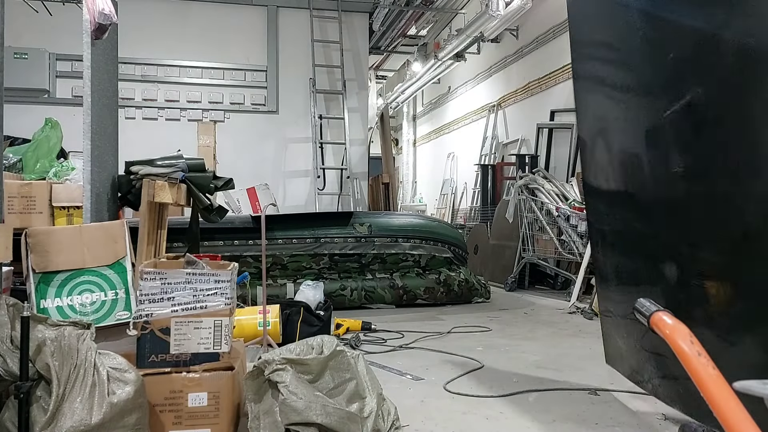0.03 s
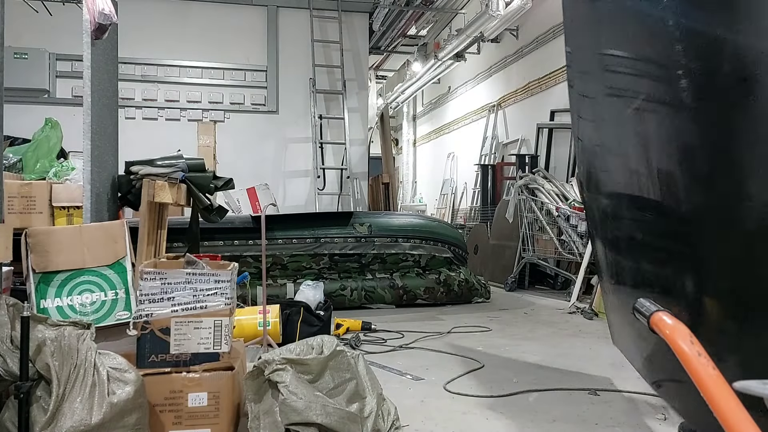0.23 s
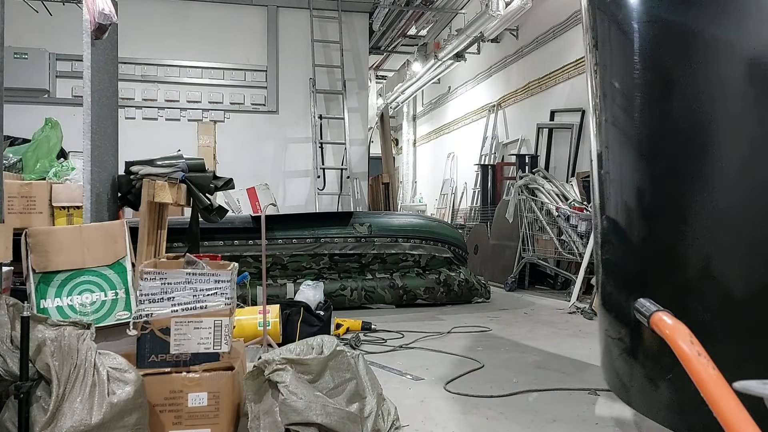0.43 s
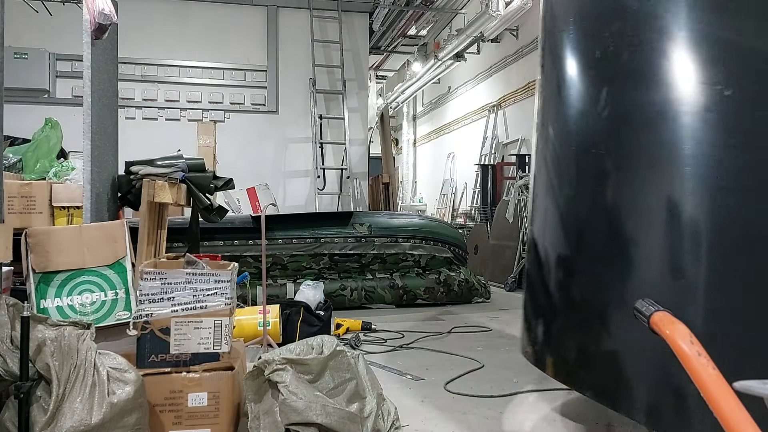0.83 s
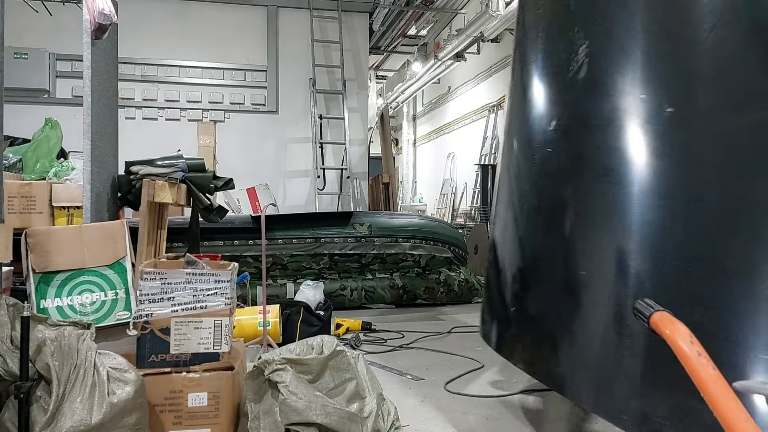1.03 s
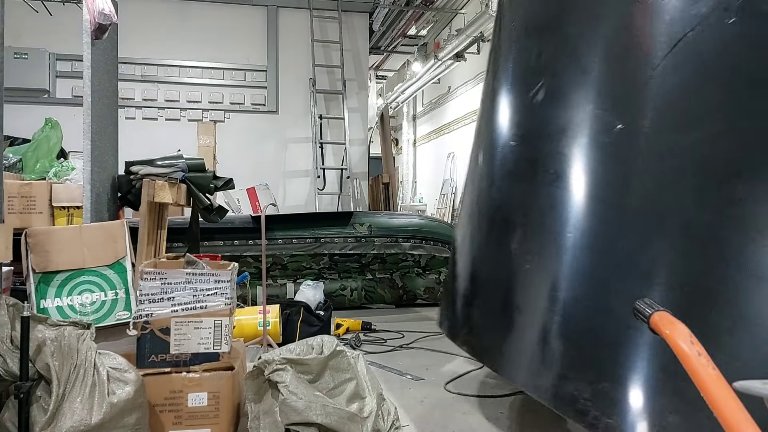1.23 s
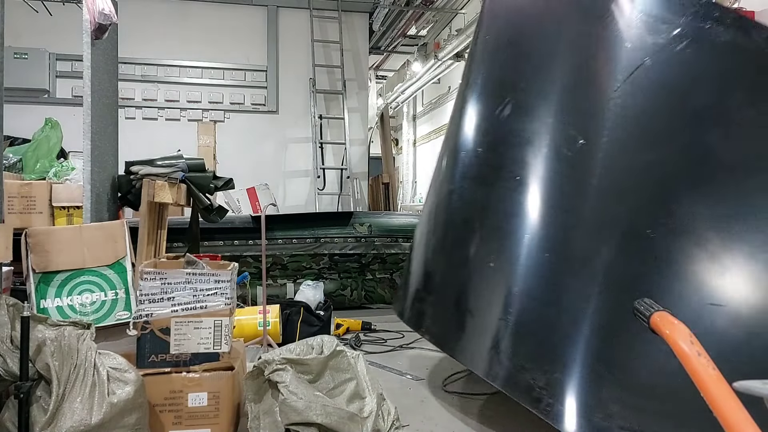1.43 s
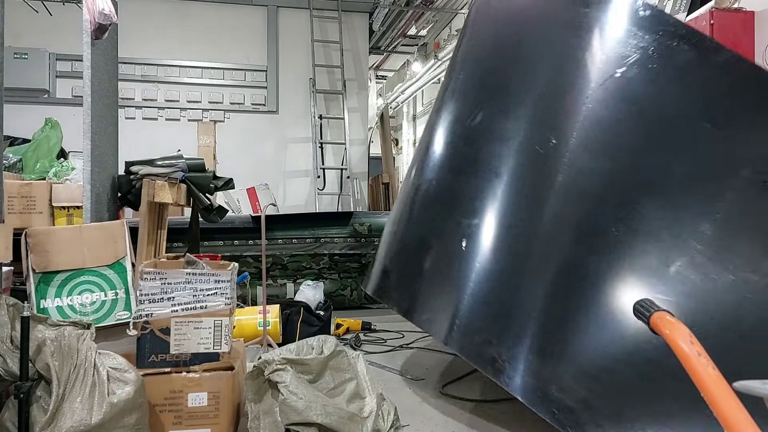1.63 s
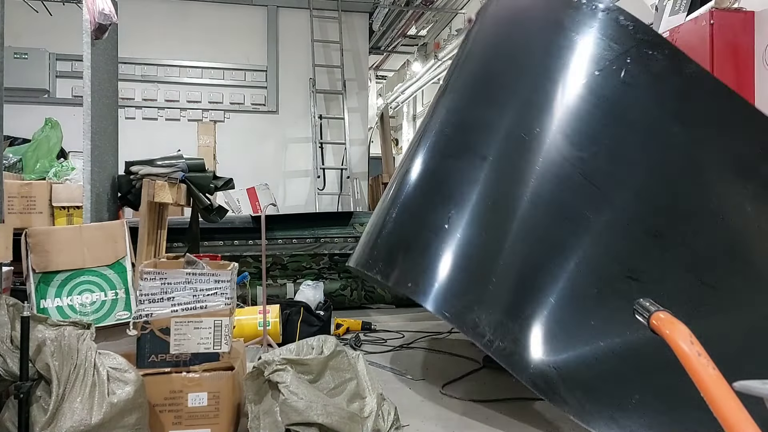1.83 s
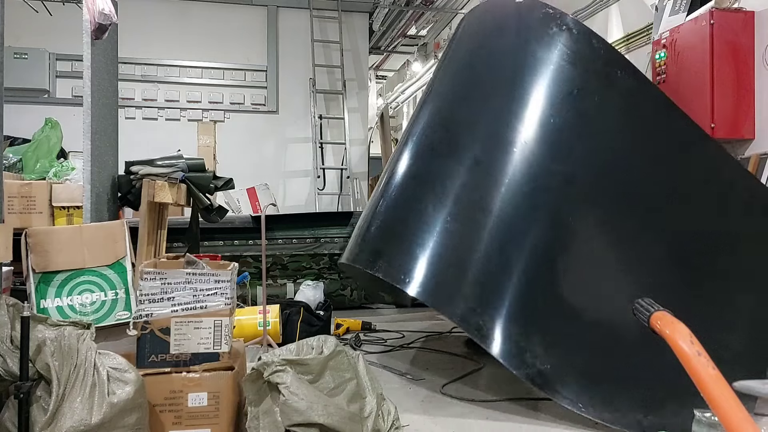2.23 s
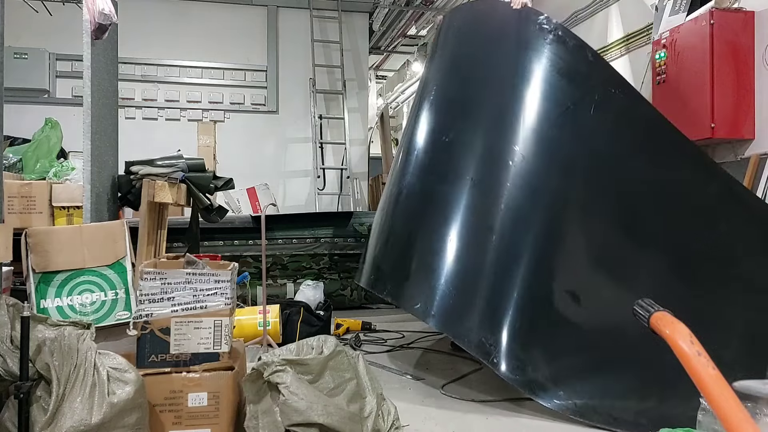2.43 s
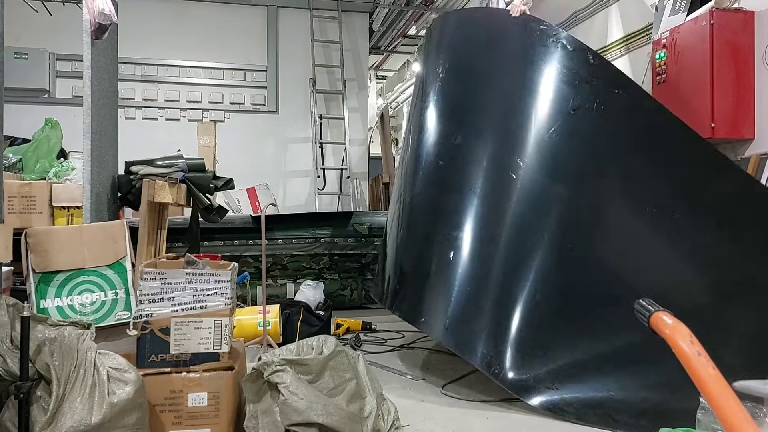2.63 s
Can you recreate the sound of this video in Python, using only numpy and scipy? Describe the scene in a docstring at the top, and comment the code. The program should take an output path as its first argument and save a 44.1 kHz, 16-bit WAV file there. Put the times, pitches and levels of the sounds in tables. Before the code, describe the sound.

A large plastic sheet is dragged across a concrete workshop floor. It buckles with soft thuds and judders in a low drone, then slides on with a gritty hiss and a brief wobble. Close by, with light hall reverberation.

```python
"""A workshop with a concrete floor, over which a large plastic sheet is dragged and bent.
Sliding friction on the grit makes the edge hiss, and stick-slip motion sets fixed low resonances of
room and sheet droning, while another glides as the sheet bends. Now and then the edge catches and the
sheet buckles with a thud; the whole sheet wobbles. The hall reverberates over a faint room noise."""
import sys
import numpy as np
from scipy import signal
from scipy.fft import rfft, irfft
from scipy.io import wavfile
from scipy.ndimage import uniform_filter1d

SR = 44100
rng = np.random.default_rng(int(sys.argv[2]) if len(sys.argv) > 2 else 0)


def unload_wav(signal):
    """Save mono or channel-first audio to the path in sys.argv[1] as 16-bit WAV at rate SR, clipped to [-1, 1]."""
    wavfile.write(
        sys.argv[1],
        SR,
        np.round(np.clip(np.atleast_2d(signal).T, -1, 1) * 32767).astype(np.int16),
    )


N = 119070
TIME = np.arange(N) / SR

# Fixed low resonances of room and sheet, droning and ringing. Each row: frequency in Hz, decay time T60
# in seconds, then relative levels in dB when bumped, in the judder and in the wobble.
RESONANCES = [(42, 0.61, -34, -38, -11), (57.3, 0.14, -24.5, -36, -5), (74.6, 0.2, -16, -24, 2),
              (113.4, 0.31, -34, -30, 8.5), (123.2, 0.37, -7, -16.5, -8), (141.8, 0.6, -14.5, -11.5, -43),
              (206.4, 0.6, -8, -5.5, -27), (227.3, 0.3, 2, -5, -28), (259, 0.49, -14, -4, -21),
              (290, 0.6, -19, -5.5, -3), (402.4, .25, -5.5, -3, -33), (455.4, 0.42, -5, -8, -39),
              (533.4, 0.6, -6.5, -11, -42), (585.5, 0.45, -22, -10.5, -42), (823, 0.58, -32, -14, -37)]
# Dense ring between the resonances. Each row: frequency in Hz, relative spectral level in dB.
BODY_SPECTRUM = [(90, -23), (125, -36), (170, -14), (250, 10), (340, 8), (450, 1), (560, 3), (650, -28),
                 (820, -32), (1200, -38), (2500, -58)]
# Main resonance of the bent sheet. Each row: time in seconds, frequency in Hz.
BEND_PITCH = [(0, 293), (.19, 269), (.215, 198), (.4, 219), (.6, 249), (.85, 255), (1.05, 247), (1.36, 227),
              (1.88, 250), (2.1, 285), (2.45, 288), (2.7, 267)]
# Strength of the judder. Each row: time in seconds, level in dB.
JUDDER_LEVEL = [(0, -42.5), (.12, -39.5), (.2, -39), (.28, -33.5), (.44, -25), (.57, -34.5), (.66, -26),
                (.76, -24.5), (.85, -24.5), (1.02, -28.5), (1.22, -41.5), (1.82, -58), (1.88, -40),
                (1.95, -39.5), (2.09, -35.5), (2.22, -36.5), (2.44, -44.5), (2.6, -70), (2.67, -43.5),
                (2.7, -44)]
# Buckling thuds. Each row: start in seconds, relative level in dB, pitch in Hz.
BUCKLES = [(.0, -32.5, 119), (.215, -18.5, 182), (.228, -18.5, 193), (0.267, -17, 128), (.27, -17.5, 245),
           (.283, -22.5, 283), (.304, -18, 127), (0.316, -16.5, 233), (0.328, -17.5, 125),
           (0.365, -19.5, 125), (.39, -19.5, 216), (0.407, -15, 231), (0.442, -21.5, 234), (.491, -20, 241),
           (.505, -23.5, 129), (.547, -25, 224), (.587, -21.5, 248), (1.324, -32.5, 131), (1.335, -31, 230),
           (1.361, -28.5, 217), (1.38, -33, 135), (1.875, -34, 245), (2.275, -36, 75), (2.299, -32, 102),
           (2.435, -31, 106)]
# Strength of the wobble. Each row: time in seconds, level in dB.
WOBBLE_LEVEL = [(0, -40), (.08, -43.5), (.2, -41), (.23, -34), (.38, -36), (.6, -42.5), (1.1, -50),
                (1.28, -66), (1.42, -47), (1.65, -55), (1.82, -59), (2.18, -54), (2.3, -41.5),
                (2.45, -41.5), (2.55, -53), (2.7, -53)]
# Hiss (following the sliding speed), scrape and sizzle. Each row: time in seconds, relative level in dB.
HISS_LEVEL = [(0.0, -56.5), (0.07, -59.5), (0.25, -48), (0.31, -50), (0.5, -42.5), (0.77, -42.5),
              (1.04, -39), (1.65, -37.5), (2.04, -39.5), (2.09, -43), (2.42, -39), (2.62, -58.5),
              (2.65, -47.5), (2.7, -49.5)]
SCRAPE_LEVEL = [(0, -50), (.15, -49), (.35, -48), (.55, -47), (.76, -66), (.83, -40.5), (.95, -38),
                (1.1, -49.5), (1.4, -46), (1.65, -44), (1.85, -44), (2.2, -39), (2.33, -34.5),
                (2.45, -35.5), (2.6, -54.5), (2.66, -46), (2.7, -46)]
SIZZLE_LEVEL = [(0, -56.5), (.14, -48.5), (.168, -44), (.205, -50), (.25, -46.5), (.35, -49), (.5, -44),
                (1.2, -44.5), (1.95, -44), (2.3, -46.5), (2.55, -68), (2.7, -51)]
# Treble of the hiss, duller as the sheet slows. Each row: time in seconds, gain in dB.
TREBLE_GAIN = [(0, 0.5), (.6, 0), (1.0, 1), (1.6, 0), (1.95, .5), (2.25, 1.5), (2.42, -3), (2.55, -5),
               (2.7, -3)]
# Dull rubs of the edge. Each row: start in seconds, length in seconds, level in dB.
EDGE_SCUFFS = [(0.071, 0.046, -40), (0.118, 0.061, -36.5), (0.199, 0.047, -34), (0.239, 0.051, -33),
               (0.4, 0.059, -32)]
# Friction noises and the quiet room. Each row: frequency in Hz, relative spectral level in dB.
HISS_SPECTRUM = [(300, -2), (600, 3), (1200, 2), (2000, 1), (3300, -.5), (4800, -0.9), (7000, -6.5),
                 (8800, -6), (10200, -8), (11800, -4), (14000, -14), (16000, -12)]
SCRAPE_SPECTRUM = [(250, 0), (500, -11.5), (800, -4.5), (1200, -5.5), (1900, -14.5), (3000, -19.5),
                   (6000, -54), (12000, -30)]
SIZZLE_SPECTRUM = [(5000, -25), (8000, -13), (10300, -5.5), (11700, 3), (13000, 7.5), (16000, 6)]
SCUFF_SPECTRUM = [(330, -29), (450, 3.5), (560, 0), (660, -10), (830, -10.5), (1200, -32), (2500, -50)]
ROOM_SPECTRUM = [(36, -12), (44, 9), (100, 4), (300, -26), (1000, -18), (4000, -29), (16000, -36)]
# Likeness of left and right. Each row: frequency in Hz, correlation (limited to 0.99 in use).
COHERENCE = [(60, 2.6), (130, 1.1), (260, 0.8), (500, 0.66), (900, 0.42), (1500, 0.37), (3000, -0.18),
             (6000, 0.02), (16000, -0.03)]
# Stereo balance. Each row: frequency in Hz, left minus right in dB.
PAN = [(60, 8), (130, -3), (280, -0.9), (1200, 0), (2500, -1.5), (4500, 0.5), (8500, 1.5), (13000, -3.5)]

HALL_T60_S, HALL_DB = .7, -8


def judder():
    """Forced vibration: the slips of the edge keep the resonances of room and sheet droning."""
    force = slips()
    modes = driven_modes(force, [mode[3] for mode in RESONANCES], contact_hz=590)
    body = from_db(-2) * unit_rms(body_ring(force))
    bend = from_db(-3.5) * steady(bend_resonance(force), seconds=.065)
    return level(JUDDER_LEVEL) * steady(modes + body + bend, seconds=.0466)


def slips(per_second=75, jitter=.4, spread_db=3.5):
    """Stick-slip friction: the edge grips and lets go in an uneven train of impulses."""
    gap, strength = rng.standard_normal((600, 2)).T
    starts = (np.cumsum(np.exp(jitter * gap)) / per_second * SR).astype(int)
    force = np.zeros(N)
    force[starts[starts < N]] = from_db(spread_db * strength[starts < N])
    return force


def driven_modes(force, levels_db, contact_hz):
    """Modal superposition: a soft, lasting force sustains each fixed resonance and its reverberation."""
    force = signal.sosfilt(lowpass(contact_hz), force)
    total = 0
    for (hz, t60, *_), db in zip(RESONANCES, levels_db):
        mode = ring(force, hz, t60)
        total += from_db(db) * stereo(steady(mode, seconds=.27), steady(hall(mode), seconds=.15), hz)
    return unit_rms(total)


def ring(force, hz, t60):
    """A damped harmonic oscillator: a unit impulse rings at height 1."""
    decay, step = from_db(-60 / (t60 * SR)), 2 * np.pi * hz / SR
    return signal.lfilter([.5, 0, -.5], [1, -2 * decay * np.cos(step), decay * decay], force + 1e-18)


def body_ring(force, t60=.27):
    """Modal overlap: crowded resonances merge into a quickly dying noise."""
    response = coloured(white(), BODY_SPECTRUM) * from_db(-60 * TIME / t60)
    return signal.fftconvolve(force[None], response, axes=1)[:, :N]


def bend_resonance(force, width_hz=13.7):
    """A time-varying resonator: its natural frequency glides as the sheet is bent."""
    hz = np.interp(TIME, *np.transpose(BEND_PITCH))
    phasor = np.exp(2j * np.pi * np.cumsum(hz) / SR)
    decay = np.exp(-np.pi * width_hz / SR)
    return (phasor * signal.lfilter([1], [1, -decay], force / phasor + 1e-18)).real


def bumps(rise_s=.002, thud_t60=.075, contact_hz=428, body_db=-9, modes_db=-14):
    """Impulse excitation: each buckle is a round thud whose blow also sets room and sheet ringing."""
    force, thuds = np.zeros(N), np.zeros(N)
    for start, db, hz in BUCKLES:
        age = np.maximum(TIME - start, 0)
        envelope = from_db(db - 60 * age / thud_t60) * (1 - np.exp(-age / rise_s))
        thuds += envelope * np.sin(2 * np.pi * hz * age)
        force[int(start * SR)] += from_db(db)
    force = signal.sosfilt(lowpass(contact_hz), force + 1e-18)
    mean_hz = np.mean([hz for _, _, hz in BUCKLES])
    total = 2 * stereo(thuds, hall(thuds), mean_hz) + from_db(body_db) * body_ring(force)
    for hz, t60, db, *_ in RESONANCES:
        mode = from_db(db + modes_db) * ring(force, hz, t60)
        total += stereo(mode + from_db(HALL_DB) * hall(mode), hall(mode), hz)
    return total


def wobble():
    """Random excitation: bending shakes mainly the lowest resonances of room and sheet."""
    modes = driven_modes(rng.standard_normal(N), [mode[4] for mode in RESONANCES], contact_hz=144)
    return level(WOBBLE_LEVEL) * steady(modes, seconds=.067)


def sliding_edge(hiss_db=5, treble_hz=5800):
    """Sliding friction: the edge gives off a broad hiss, a coarse scrape and a thin sizzle."""
    rush = friction(HISS_SPECTRUM, flicker_db=.38)
    dull = signal.sosfiltfilt(lowpass(treble_hz), rush)
    hiss = from_db(hiss_db) * level(HISS_LEVEL) * (dull + level(TREBLE_GAIN) * (rush - dull))
    scrape = level(SCRAPE_LEVEL) * friction(SCRAPE_SPECTRUM, flicker_db=-1.8)
    sizzle = level(SIZZLE_LEVEL) * friction(SIZZLE_SPECTRUM, flicker_db=1.1)
    return hiss + scrape + sizzle


def friction(spectrum, flicker_db, grains_per_s=2500, grain_db=-8):
    """Roughness noise: countless grit contacts fuse to a rush, with coarser grains standing out."""
    contacts = (rng.random((2, N)) < grains_per_s / SR) * np.sign(white())
    grains = contacts * from_db(np.minimum(rng.exponential(1, (2, N)), 4))
    rush = coloured(white() + from_db(grain_db) * unit_rms(grains), spectrum)
    return rush * from_db(flicker_db * drift(rate_hz=15))


def scuffs():
    """Transient friction: brief rubs of dull noise swell and fade in a half sine."""
    swell = sum(from_db(db) * np.sin(np.pi * np.clip((TIME - start) / length, 0, 1))
                for start, length, db in EDGE_SCUFFS)
    return swell * steady(coloured(white(), SCUFF_SPECTRUM), seconds=.018)


def hall(sound):
    """Diffuse reverberation: an exponentially dying cloud of reflections with unit energy."""
    cloud = rng.standard_normal(N) * from_db(-60 * TIME / HALL_T60_S)
    return signal.fftconvolve(sound, cloud / np.linalg.norm(cloud))[:N]


def room_noise(db=-62.5):
    """Stationary background noise: the faint rumble of the quiet workshop."""
    return from_db(db) * coloured(white(), ROOM_SPECTRUM)


def stereo(mid, side, hz):
    """Partial coherence: two unrelated signals mix to left and right, as alike as the hall leaves them."""
    alike, pan_db = np.clip(at_hz(COHERENCE, hz), -.99, .99), at_hz(PAN, hz) / 2
    mid, side = mid * np.sqrt((1 + alike) / 2), side * np.sqrt((1 - alike) / 2)
    return np.array([(mid + side) * from_db(pan_db), (mid - side) * from_db(-pan_db)])


def coloured(pair, spectrum, top_hz=15900):
    """Spectral shaping of two white noises into stereo noise of unit power."""
    hz = np.arange(N // 2 + 1) * SR / N
    bass_rolloff = np.minimum(hz / spectrum[0][0], 1) ** 2
    gain = from_db(at_hz(spectrum, hz)) * bass_rolloff * (hz < top_hz)
    return unit_rms(irfft(stereo(*rfft(pair), hz) * gain, N))


def white():
    """Two independent white noises."""
    return rng.standard_normal((2, N))


def drift(rate_hz, hop=40):
    """A slow random fluctuation of unit power."""
    pole = np.exp(-2 * np.pi * hop * rate_hz / SR)
    noise = rng.standard_normal(N // hop + 2002)
    slow = signal.lfilter([1], [1, -2 * pole, pole * pole], noise)[2000:]  # once the filter has settled
    return np.interp(np.arange(N) / hop, np.arange(len(slow)), unit_rms(slow))


def steady(x, seconds):
    """Division by the running RMS holds the power steady."""
    power = uniform_filter1d(np.mean(np.atleast_2d(x) ** 2, axis=0), int(seconds * SR))
    return x / np.sqrt(np.abs(power) + 1e-12)


def lowpass(hz):
    """A second-order low-pass filter."""
    return signal.butter(2, hz, fs=SR, output="sos")


def from_db(db):
    """Decibels to amplitude ratio."""
    return 10 ** (np.asarray(db) / 20)


def unit_rms(x):
    """Normalisation to unit power."""
    return x / np.sqrt(np.mean(x ** 2) + 1e-20)


def level(rows):
    """An amplitude envelope from rows of seconds and dB."""
    return from_db(np.interp(TIME, *np.transpose(rows)))


def at_hz(rows, hz):
    """Interpolation on a log-frequency axis."""
    frequencies, values = np.transpose(rows)
    return np.interp(np.log(np.maximum(hz, 1)), np.log(frequencies), values)


def scene(radiation_hz=44.4, left_lag_s=.00021):
    """Superposition of sheet and room; the sheet lies to the right, so its sound reaches the left later."""
    radiation = signal.butter(2, radiation_hz, "high", fs=SR, output="sos")  # slow motion radiates little
    left, right = signal.sosfilt(radiation, judder() + bumps()) + wobble() + sliding_edge() + scuffs()
    left = np.pad(left, (int(left_lag_s * SR), 0))[:N]
    return np.array([left, right]) + room_noise()


def record(dry, bass_hz=33, top_hz=15900):
    """Band limiting: the microphone drops the deepest bass, and the top is cut steeply."""
    dry = signal.sosfilt(signal.butter(4, bass_hz, "high", fs=SR, output="sos"), dry)
    return signal.sosfilt(signal.ellip(12, .1, 80, top_hz, fs=SR, output="sos"), dry)


dry = scene()
out = record(dry)
unload_wav(out)
```